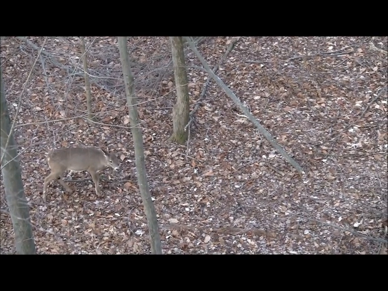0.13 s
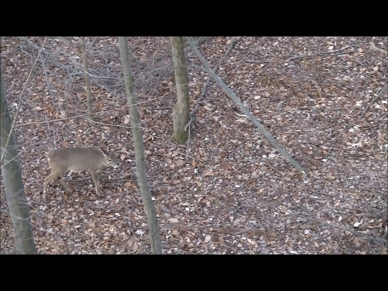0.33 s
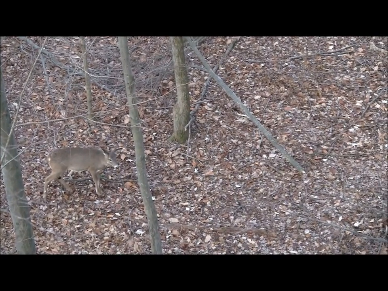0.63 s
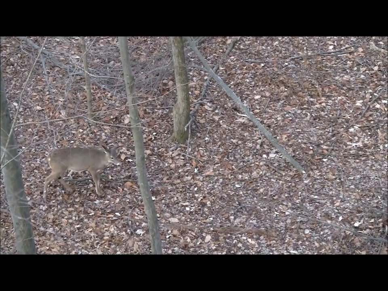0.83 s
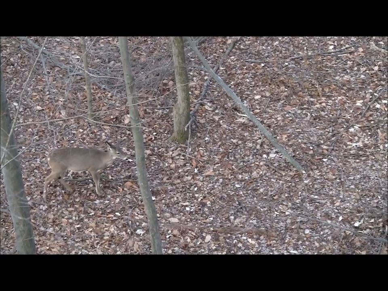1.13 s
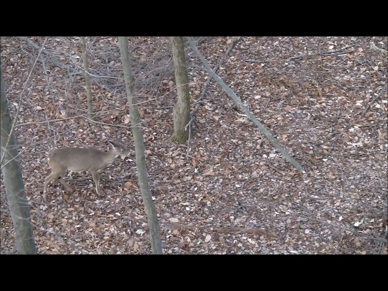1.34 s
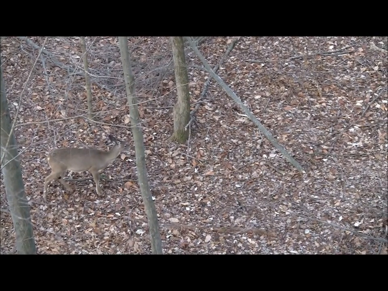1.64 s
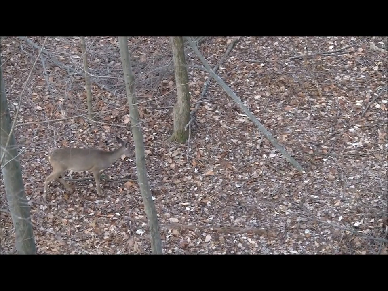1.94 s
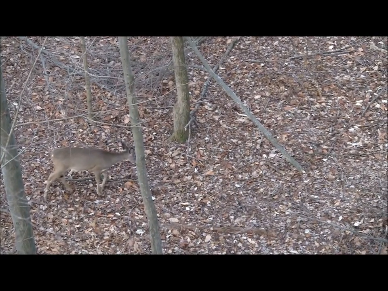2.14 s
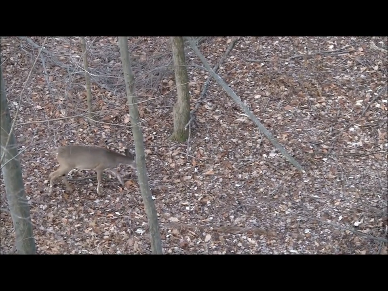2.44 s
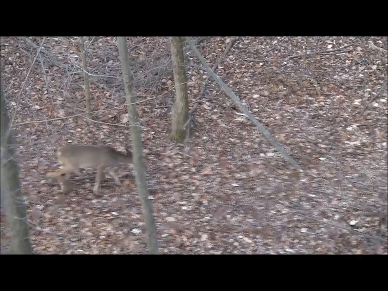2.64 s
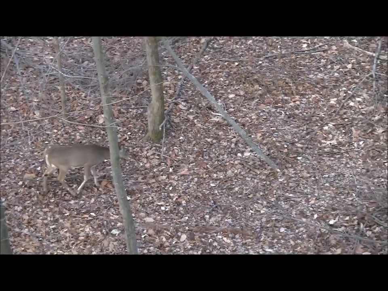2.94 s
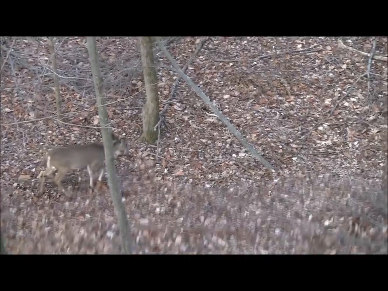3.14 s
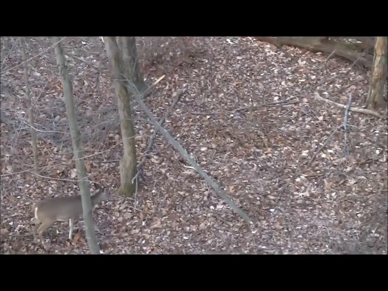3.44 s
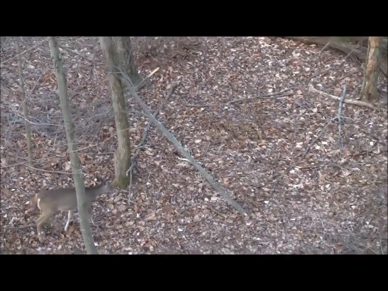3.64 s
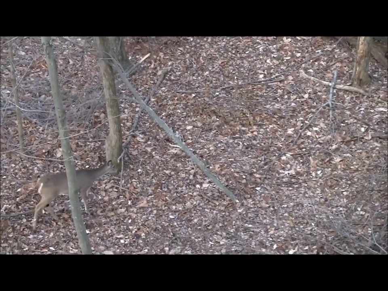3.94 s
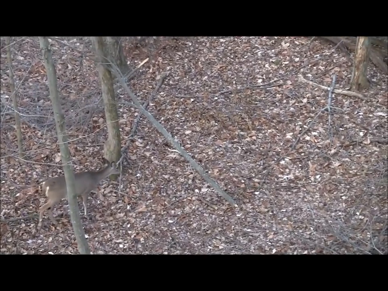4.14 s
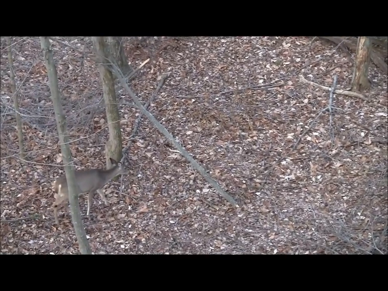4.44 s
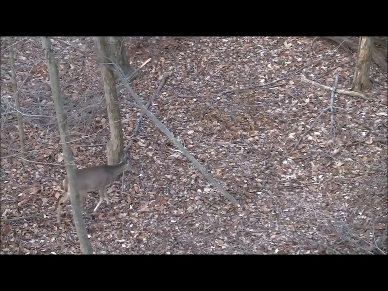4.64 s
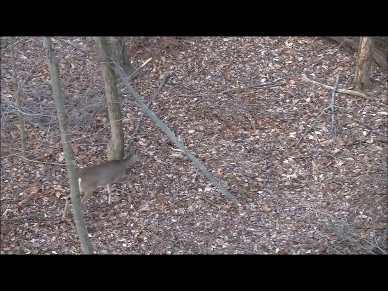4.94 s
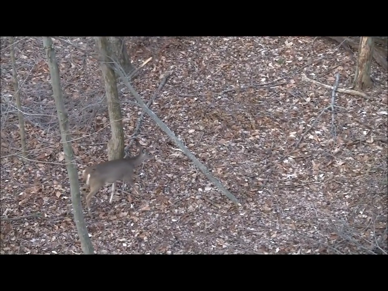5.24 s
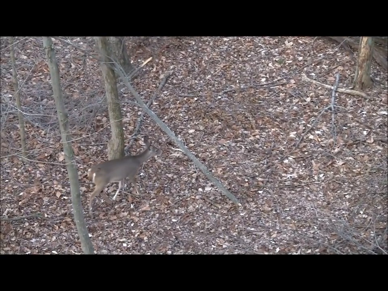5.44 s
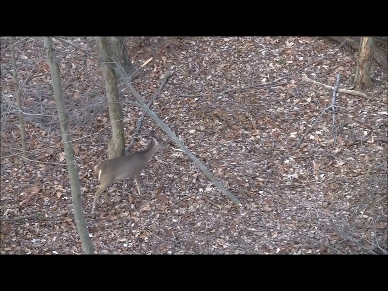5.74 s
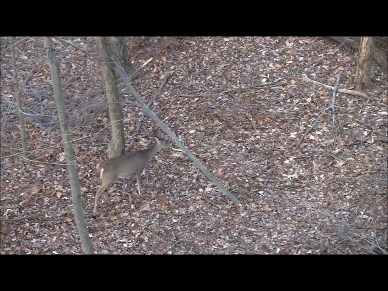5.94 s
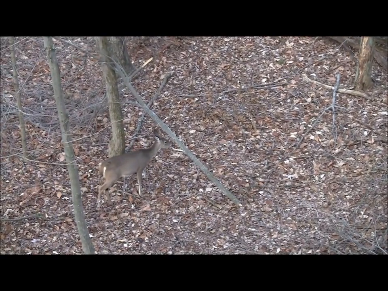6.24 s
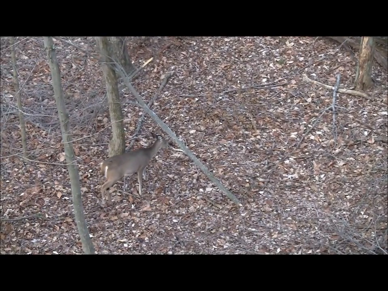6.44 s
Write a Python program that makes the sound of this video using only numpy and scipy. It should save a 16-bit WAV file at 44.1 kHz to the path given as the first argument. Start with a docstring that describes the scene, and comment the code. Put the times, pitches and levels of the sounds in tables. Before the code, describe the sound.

Outdoor stereo ambience from a stand among trees: continuous distant road rumble, low drone and soft hiss. The first couple of seconds are nearly eventless. Then nearby clothing rustles quietly, with tiny ticks from the middle onward. Near the end, three loud brittle bursts of snaps sound very close on the left, lightly echoed by the wood, with low puffs of breeze.

```python
"""A bare wood heard from a tree stand, with stiff cloth close to the microphones, mostly on the left.
The cloth rustles as dense fibre slips, then cracks in short sprays of tiny snaps.
The cracks scatter faintly around the wood, and stronger jolts ring the low modes of the stand.
A far road gives a steady roar of coloured noise, an engine drone and tyre whines of wavering sines.
A light breeze pushes low noise over the microphone ports, and the microphones hiss."""
import sys
import numpy as np
from scipy import signal
from scipy.fft import rfft, irfft, next_fast_len
from scipy.io import wavfile

SR = 44100
rng = np.random.default_rng(int(sys.argv[2]) if len(sys.argv) > 2 else 0)


def wav_record(signal):
    """Record a signal, one row per channel, as 16-bit PCM in the file named by sys.argv[1]."""
    frames = np.transpose(np.atleast_2d(signal))
    bounded = np.clip(frames, -1, 1)
    # unit amplitude maps onto the largest positive 16-bit level
    quanta = np.round(bounded * 32767).astype(np.int16)
    wavfile.write(sys.argv[1], SR, quanta)


N = 290178   # samples, about 6.6 s


def from_db(db):
    """Gain of a level in dB."""
    return 10 ** (np.asarray(db) / 20)


def rms_one(x):
    """Scaled to rms 1."""
    return x / np.sqrt(np.mean(x ** 2) + 1e-20)


def lowpass(x, order, hz):
    """Keeps what lies below hz, with a Butterworth slope."""
    return signal.sosfilt(signal.butter(order, hz, fs=SR, output="sos"), x)


def in_time(rows):
    """Columns of an automation curve, drawn out to every sample."""
    s, *columns = np.transpose(rows)
    return [np.interp(np.arange(N) / SR, s, c) for c in columns]


def faded(start, rise, hold, fall):
    """Swells from 0 to 1, holds and sinks back; all in s."""
    t = np.arange(N) / SR - start
    ramp = np.minimum(t / rise, 1 - (t - rise - hold) / fall)
    return np.sin(np.pi / 2 * np.clip(ramp, 0, 1)) ** 2


def drift(rate_hz):
    """Slow random wandering of spread 1: noise through two equal poles at rate_hz."""
    step = 40   # samples between the points of the slow curve
    r = np.exp(-2 * np.pi * rate_hz * step / SR)
    noise = rng.standard_normal(N // step + 2002)
    slow = signal.lfilter([1], [1, -2 * r, r * r], noise)[2000:]   # skip the filter's start
    return np.interp(np.arange(N) / step, np.arange(len(slow)), rms_one(slow))


def coloured(x, spectrum):
    """Shapes x to a spectrum, with minimum phase so that nothing sounds early."""
    size = next_fast_len(x.shape[-1] + 4096)
    hz, db = np.transpose(spectrum)
    log_hz = np.log(np.maximum(np.fft.rfftfreq(size, 1 / SR), 1))
    log_gain = np.interp(log_hz, np.log(hz), db) * np.log(10) / 20
    # fold the cepstrum onto positive time
    cepstrum = irfft(log_gain, size)
    cepstrum[1:size // 2] *= 2
    cepstrum[size // 2 + 1:] = 0
    response = np.exp(rfft(cepstrum))
    return irfft(rfft(x, size) * response, size)[..., :x.shape[-1]]


def resonance(x, hz, width_hz):
    """A ringing band with gain 1 on top."""
    r = np.exp(-np.pi * width_hz / SR)
    feedback = [1, -2 * r * np.cos(2 * np.pi * hz / SR), r * r]
    return signal.lfilter((1 - r * r) / 2 * np.array([1, 0, -1]), feedback, x)


def grains(size, per_s, spread_db):
    """Random clicks of uneven strength and either sign; rms 1."""
    level_db = spread_db * np.minimum(rng.exponential(1, size), 4)
    strength = from_db(level_db) * rng.choice([-1, 1], size)
    return rms_one(strength * (rng.random(size) < per_s / SR))


def tone(hz, db, waver_hz):
    """A sine whose pitch wavers a little on its way through the air."""
    pitch = hz + waver_hz * drift(8.3)
    return np.sqrt(2) * from_db(db) * np.sin(2 * np.pi * np.cumsum(pitch) / SR)


# how alike left and right are in sound from all around: f/Hz, likeness
LIKENESS = [(60, 0.97), (130, 0.92), (290, 0.86), (640, 0.78), (1410, 0.24), (3100, 0.03), (6820, 0.15),
            (15000, 0.079)]


def diffuse(spectrum):
    """Stereo noise from all around: alike in the bass, nearly unrelated in the treble; rms 1."""
    hz, alike = np.transpose(LIKENESS)
    alike = np.clip(alike, -.95, .98)
    mid, side = coloured(rng.standard_normal((2, N)), spectrum)
    mid = coloured(mid, np.c_[hz, 10 * np.log10(1 + alike)])
    side = coloured(side, np.c_[hz, 10 * np.log10(1 - alike)])
    return rms_one(np.array([mid + side, mid - side]))


# cracks of the cloth: t/s, level/dB, left minus right/dB, tilt/(dB per octave), ring f/Hz,
# ring level/dB, hold/s
CRACKS = [(0.929, -42, 8, -6, 5200, 19, 0.0017), (3.2, -38, 2, 4, 12000, 1, .001),
          (3.5835, -29, 11, -11, 1290, 7, 0.0006), (3.584, -39, 5, -10, 5070, 20, .002),
          (3.68, -42, 3.5, -8, 2530, 0, 0.0035), (3.796, -39, 4, -9, 6100, 3, 0.0014),
          (3.828, -32, 2.5, -9, 3830, 15, 0.001), (3.8285, -34, 3, -11, 3200, 10, 0.0011),
          (3.8302, -39.5, 10, -11, 3900, 16, 0.008), (3.834, -43, 11, -11, 3100, 8, 0.0055),
          (4.1008, -33, -2.5, -7, 5970, 16, .0008), (4.113, -20.5, -7, -11, 1060, 18, 0.0005),
          (4.1132, -33, -7, -7, 4000, 14, .0005), (4.1157, -28, -7, -10, 2100, 14, .002),
          (4.118, -32, -15, -13.5, 810, 15, 0.0068), (4.127, -37, -7, -1, 9000, 6, 0.0016),
          (4.133, -32, -9, -1, 3100, 12, 0.002), (4.135, -32.5, -11, -5, 8500, 11, 0.0018),
          (4.1375, -40, -8, 4, 3000, 10, .002), (4.141, -36, -9, -12, 800, 9, 0.0026),
          (4.290, -42, 3, -4, 5200, 18, .001), (4.448, -26.5, -2, 2, 5930, 9, 0.0013),
          (4.611, -42, 4, 0, 9800, 16, .001), (4.779, -43, 10, 0, 14500, 6, .002),
          (4.79, -32, 6, -1, 13100, 11, 0.0011), (4.7958, -22.5, 11, -3.5, 1710, 3, 0.00092),
          (4.812, -36, 8, -8, 10000, 0, .001), (4.821, -20.5, 11.5, -4.5, 2490, 4, 0.0013),
          (4.831, -31, -3, -4, 1480, 15, 0.0022), (4.97, -41, 9, -6, 6000, 4, .001),
          (5.083, -18, 9, -2, 6800, 13, .0003), (5.0848, -21, 10, 6, 7100, 25, .0004),
          (5.103, -27.5, 8.5, -8, 7600, 16, 0.0027), (5.129, -32, 9, -6, 8090, 4, .001),
          (5.138, -38, 12, -3, 5300, 10, .003), (5.148, -40, 12, -7, 6500, 8, .001),
          (5.195, -29.5, 11.5, -3.5, 4230, 8, 0.0023), (5.1993, -22, 12, -2, 6440, 0, 0.0013),
          (5.4526, -24, 14.5, -1, 4400, 16, 0.0014), (5.4546, -14.5, 16, -2, 11800, 5, .0006),
          (5.4551, -10.5, 9.5, 0, 4560, 9, 0.0021), (5.458, -12.5, 9.5, 0.5, 4500, 4, .002),
          (5.4606, -13, 12, -4, 11200, 4, .001), (5.4625, -9, 13.5, -2, 6800, 2, 0.00055),
          (5.4633, -18, 8.5, -5, 3050, 7, 0.0013), (5.471, -28, 7, -6, 6600, 18, .001),
          (5.8003, -16, 12.5, 1, 4750, 10, 0.0017), (5.8016, -10, 11.5, -2.5, 5600, 9.5, 0.00036),
          (5.8033, -25, 8, 11, 3720, 2, 0.0016), (5.8054, -21.5, 15, -6.5, 1830, 6, .001),
          (5.806, -24, 11, 4, 11000, 8, .001), (5.81, -19, 8, -5, 900, 1, .0001),
          (6.133, -35, 9.5, -10, 4750, 18, 0.0025), (6.2282, -30, 14, 3, 7000, 4, .0012),
          (6.2287, -14.5, 14.5, -1.5, 10500, -12, .001), (6.2312, -14, 6, -3.5, 5650, 21, 0.0019),
          (6.2326, -10, 11, 0.5, 3830, 1, 0.0017), (6.2351, -12.5, 11.5, -1, 4470, 19, 0.0011),
          (6.2363, -10, 14, -1.5, 4450, 8, .0003), (6.2385, -20, 13, -1, 2200, 5, 0.0011),
          (6.2396, -19.5, 14.5, -3, 2420, 2, 0.002)]
# colour of a snap before its tilt: f/Hz, level/dB per Hz
SNAP_COLOUR = [(350, -29.5), (600, -18), (1100, -18.5), (1800, -10), (2980, -5), (3930, -12), (4500, -7.5),
               (5100, -9.5), (5700, -7), (7400, -6.5), (8800, -8), (11100, -3.5), (13500, -10.5),
               (14800, -15), (16300, -30)]
SPRAY_RISE_S, SPRAY_T60_S = 0.00052, 0.01
FIRST_SNAP = 5.5   # against the rms of the grains
LAG_PER_DB = .58   # samples by which the louder side leads, per dB between the sides


def cracks():
    """A sprinkle swells into a sharp snap; the spray holds, then dies, with one band ringing."""
    out, t = np.zeros((2, N + 4096)), np.arange(2048) / SR
    snap_hz, snap_db = np.transpose(SNAP_COLOUR)
    for s, level_db, pan_db, tilt_db, ring_hz, ring_db, hold_s in CRACKS:
        spray = grains(len(t), 12000., 2.9)
        spray = spray * np.minimum(t / SPRAY_RISE_S, 1)
        spray[round(SPRAY_RISE_S * SR)] = FIRST_SNAP
        spray = spray * from_db(-60 * np.maximum(t - hold_s, 0) / SPRAY_T60_S)
        tilted_db = snap_db + tilt_db * np.log2(snap_hz / 4000)
        spray = coloured(spray, np.c_[snap_hz, tilted_db])
        spray = spray + from_db(ring_db) * resonance(spray, ring_hz, ring_hz / 8)
        # estimate the peak as a usual crest over the rms of its own length
        length_s = hold_s + SPRAY_T60_S / 14
        peak = 2.58 * np.sqrt(np.sum(spray ** 2) / (SR * length_s))
        for side, sign in enumerate([1, -1]):
            at = round(s * SR - sign * LAG_PER_DB * pan_db / 2)
            out[side, at:at + len(t)] += from_db(level_db + sign * pan_db / 2) * spray / peak
    return out[:, :N]


# strokes of the cloth: t/s, rise/s, hold/s, fall/s, level/dB, left minus right/dB,
# extra treble/dB, band f/Hz, band level/dB
STROKES = [(2.269, 0.03, 0.035, 0.11, -52, -6.5, 5, 9800, 7), (2.38, 0.15, 0.1, 0.3, -56, 3, 3.5, 7800, 3),
           (2.543, .01, .01, .03, -60, 2, 1, 8000, 8), (2.598, .008, .008, .02, -54.5, 4, 1, 5500, 6),
           (2.648, 0.014, 0.018, .03, -61, 5.5, 0, 4500, 3.5),
           (3.06, .04, .03, .06, -61.5, 1, 10.5, 3940, -5),
           (3.553, 0.049, 0.065, 0.59, -60, 0, 3.5, 3940, 0),
           (4.068, 0.031, 0.022, 0.067, -49, 7, -6, 3940, 0),
           (4.118, 0.0076, 0.019, 0.011, -46.5, -10, 7, 3000, 4),
           (4.143, 0.16, 0.088, 0.47, -55, 9.5, 5, 3600, -3),
           (4.358, 0.097, 0.11, 0.29, -58, 5, 4, 6500, -3),
           (4.75, 0.23, 0.11, 0.19, -52.5, 19, -0.5, 4000, 3),
           (4.781, 0.01, 0.029, 0.012, -52, -4, 14.5, 3940, -7),
           (5.186, 0.046, 0.051, 0.33, -53.5, 4.5, 4.5, 3940, -6)]
# colour of the fibre slips: f/Hz, level/dB per Hz
CLOTH_COLOUR = [(470, -29.5), (800, 5), (1150, -9.5), (1260, -4), (4740, -18.5), (6090, -21.5),
                (11000, -26.5), (14800, -32), (16000, -61)]
BAND_SHARPNESS = 7.0   # centre over width
CLUMP_DB = 0.8   # low, middle and high slips bunch up apart


def rustle():
    """Dense fibre slips in clumps, partly separate on each side."""
    shared, left, right = (grains(N, 3000., 3.2) for _ in range(3))
    slips = rms_one(coloured(0.27 * shared + np.array([left, right]), CLOTH_COLOUR))
    low, below_treble = lowpass(slips, 2, 3000), lowpass(slips, 2, 6000)
    bright = (slips - below_treble) * from_db(CLUMP_DB * drift(37.0))
    middle = (below_treble - low) * from_db(CLUMP_DB * drift(30.0))
    dull = low * from_db(CLUMP_DB * drift(30.0)) + middle
    out = 0
    for s, rise, hold, fall, level_db, pan_db, treble_db, hz, band_db in STROKES:
        sides_db = level_db + np.array([[pan_db], [-pan_db]]) / 2
        gain = faded(s, rise, hold, fall) * from_db(sides_db)
        band = resonance(slips, hz, hz / BAND_SHARPNESS)
        out = out + gain * (dull + from_db(treble_db) * bright + from_db(band_db) * band)
    return out * from_db(0.8 * drift(25.0) + 0.8 * drift(4.4))   # quick and slow unevenness


# jolts that reach the stand: t/s, level/dB
JOLTS = [(3.5843, -41), (5.4535, -36.5), (5.807, -40), (6.2305, -36), (6.2331, -35)]
# the stand's low modes: f/Hz, level/dB, t60/s
STAND_MODES = [(345, 3, 0.053), (392, 6, 0.06), (482, 4, 0.051), (575, -1, 0.061)]


def thumps():
    """The stronger jolts set the stand's low modes ringing as decaying sines."""
    out, t = np.zeros(N + 4096), np.arange(2048) / SR
    knock = sum(from_db(db - 60 * t / t60) * np.sin(2 * np.pi * hz * t) for hz, db, t60 in STAND_MODES)
    # a light frame moves no deep air
    knock = signal.sosfilt(signal.butter(4, 320, "high", fs=SR, output="sos"), knock)
    for s, db in JOLTS:
        at = round(s * SR)
        out[at:at + len(t)] += from_db(db) * knock
    return out[:N]


SCATTER_DB, SCATTER_T60_S = -19, 0.06   # returns from the trunk and branches


def scattered(x):
    """Adds a faint diffuse tail of decaying noise, different on each side."""
    t = np.arange(4096) / SR
    tail = rng.standard_normal((2, len(t))) * from_db(-60 * t / SCATTER_T60_S)
    tail = lowpass(tail, 1, 9000)   # bark dulls the returns
    tail = tail / np.linalg.norm(tail, axis=1, keepdims=True)
    return x + from_db(SCATTER_DB) * signal.fftconvolve(x, tail, axes=1)[:, :N]


# colour of the roar: f/Hz, level/dB per Hz
ROAR_COLOUR = [(12, -95), (20, -42.5), (86, -15), (154, -6.5), (185, -8), (213, -7), (344, -10.5),
               (380, -14), (464, -12), (579, -11.5), (627, -14.5), (666, -12.5), (1190, -22), (1670, -41),
               (2400, -46), (3120, -59), (5280, -120)]
# level of the roar: t/s, deep level/dB, bright level/dB
ROAR_LEVEL = [(0, -46, -43), (1.2, -47, -40.5), (2.5, -46, -43), (3.4, -47.5, -43.5), (4.4, -47, -43),
              (5.6, -46, -42.5), (6.58, -53.5, -41)]
ROAR_SWAY_DB = 1.04   # how far the roar wanders


def road():
    """Tyre roar from afar; its deep and bright parts swell apart as vehicles come and go."""
    deep_db, bright_db = in_time(ROAR_LEVEL)
    roar = diffuse(ROAR_COLOUR)
    deep = lowpass(roar, 1, 350)
    deep_gain = from_db(deep_db + ROAR_SWAY_DB * drift(1.5))
    bright_gain = from_db(bright_db + ROAR_SWAY_DB * drift(5.4))
    return deep_gain * rms_one(deep) + bright_gain * rms_one(roar - deep)


# firing tone: t/s, level/dB
FIRING_LEVEL = [(0, -41.5), (.5, -43), (.85, -45.5), (1.05, -47.5), (1.3, -40.5), (1.55, -45), (1.75, -41),
                (2.05, -45), (2.35, -41.5), (2.5, -41), (2.65, -38), (2.95, -40.5), (3.3, -46),
                (3.75, -50.5), (3.95, -46), (4.3, -53.5), (4.6, -55), (4.85, -50), (5.15, -48.5),
                (5.3, -53), (5.6, -61), (5.8, -46), (6.25, -43), (6.58, -44)]
# tone at 3/2 of the firing pitch: t/s, level/dB
UPPER_LEVEL = [(0, -66), (2.25, -58), (2.55, -50), (2.75, -49), (2.92, -57), (3.2, -45.5), (3.45, -47),
               (3.7, -47.5), (3.95, -54), (4.1, -52), (4.35, -59), (6.58, -82)]
# orders beside them: multiple of the firing pitch, level/dB
SIDE_ORDERS = [(.75, -60), (1.25, -54)]
FIRING_HZ, SAG_HZ_PER_S = 188.4, .82   # pitch at the start, sinking as the vehicle draws away
LOWER_DB, DRONE_FLUTTER_DB = -59, 1   # level at half the firing pitch; flutter of the firing tone


def engine():
    """Firing tone and the orders beside it, locked to one sinking pitch but each wavering alone."""
    hz = FIRING_HZ - SAG_HZ_PER_S * np.arange(N) / SR
    (firing_db,), (upper_db,) = in_time(FIRING_LEVEL), in_time(UPPER_LEVEL)
    firing = tone(hz, firing_db + DRONE_FLUTTER_DB * drift(4.9), 0.5)
    upper = tone(3 * hz / 2, upper_db + 0.72 * drift(2.5), 0.76)
    lower = tone(hz / 2, LOWER_DB, 0.53)
    beside = sum(tone(k * hz, db + 2.0 * drift(2.1), 0.62) for k, db in SIDE_ORDERS)
    return (firing + upper + lower + beside) * from_db([[.3], [-.3]])   # a touch to the left


# pitch of each tyre whine: f/Hz
WHINE_HZ = [620.8, 495, 467]
# how each whine comes and goes, one curve per pitch: t/s, level/dB
WHINE_LEVELS = [
    [(0, -66), (.4, -59), (1.05, -58.5), (1.3, -40), (1.47, -55), (1.6, -45), (1.9, -47), (2.05, -52),
     (2.4, -61), (3.6, -58), (4.6, -61), (6.58, -77)],
    [(2.0, -75), (2.5, -54), (3.2, -58), (3.7, -80)],
    [(4.3, -80), (4.7, -67), (5.4, -55), (5.52, -47), (5.68, -45), (5.8, -48.5), (5.9, -55), (6.0, -48.5),
     (6.2, -53), (6.35, -75)],
]
WHINE_FLUTTER_DB = 1


def tyres():
    """Tread patterns sing for a while as vehicles pass."""
    out = 0
    for hz, curve in zip(WHINE_HZ, WHINE_LEVELS):
        level_db, = in_time(curve)
        out = out + tone(hz, level_db + WHINE_FLUTTER_DB * drift(8.7), 1.16)
    return out


# gusts over the microphone ports: t/s of the peak, fall/s (the rise takes half), level/dB
GUSTS = [(0.16, 0.33, -52), (1.04, .4, -53), (4.237, 0.25, -47), (3.3, 0.13, -63), (5.726, 0.12, -42),
         (6.074, 0.15, -47.5)]
CALM_DB = -71.5


def breeze():
    """Lumpy pressure on each port by itself, in gusts over near calm."""
    gusts = sum(from_db(db) * faded(s - fall / 2, fall / 2, 0, fall) for s, fall, db in GUSTS)
    band = signal.butter(3, [75, 150], "band", fs=SR, output="sos")
    push = signal.sosfilt(band, rng.standard_normal((2, N)))
    return (from_db(CALM_DB) + gusts) * rms_one(push)


ROAD_LEAD = 4   # samples by which the left port hears the road first


def scene():
    """Near cloth before a far road that lies a little to the left."""
    left, right = road() + engine() + tyres()
    late_right = np.interp(np.arange(N) - ROAD_LEAD, np.arange(N), right)
    far = np.array([left, late_right])
    return far + breeze() + rustle() + scattered(cracks() + thumps())


# colour of the microphone self-noise: f/Hz, level/dB per Hz
HISS_COLOUR = [(880, -27.5), (1500, -3.5), (1710, -4), (3240, -5.5), (3500, -6), (4030, -6.5), (9990, -15),
               (14800, -22), (15700, -37), (16300, -30)]
HISS_DB, CUTOFF_HZ = -58, 16300


def record(dry):
    """The microphones add their hiss, the sharpest peaks are rounded, the top is cut."""
    hiss = from_db(HISS_DB) * diffuse(HISS_COLOUR) * from_db([[.4], [-.4]])
    rounded = 0.89 * np.tanh((dry + hiss) / 0.91)
    return signal.sosfilt(signal.cheby2(12, 60, CUTOFF_HZ, fs=SR, output="sos"), rounded)


dry = scene()
out = record(dry)
wav_record(out)
```